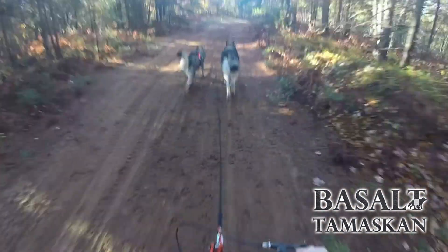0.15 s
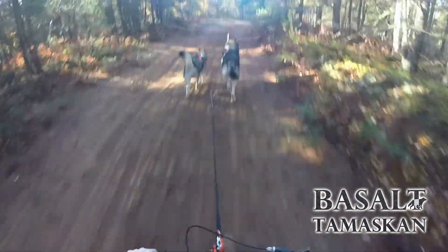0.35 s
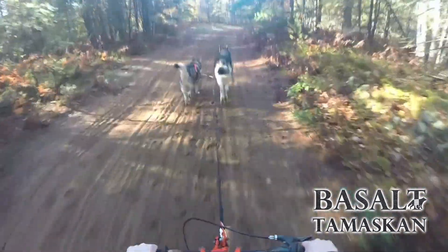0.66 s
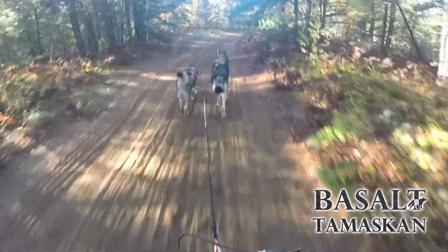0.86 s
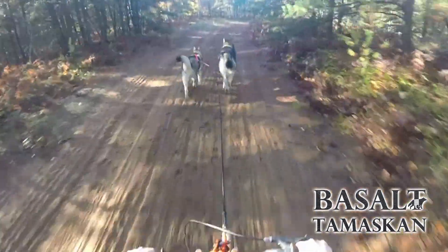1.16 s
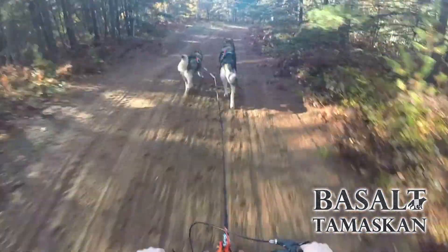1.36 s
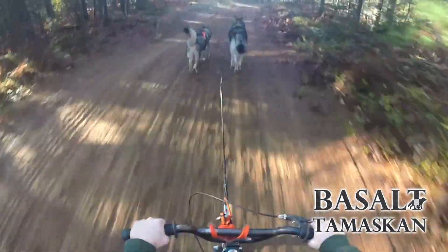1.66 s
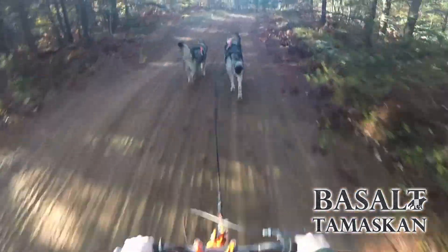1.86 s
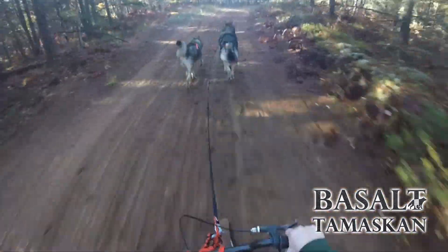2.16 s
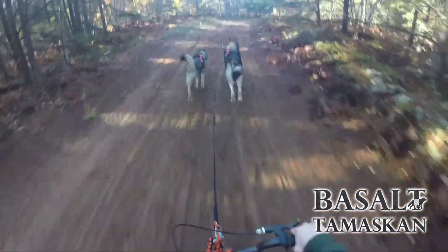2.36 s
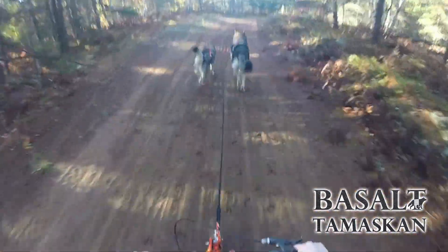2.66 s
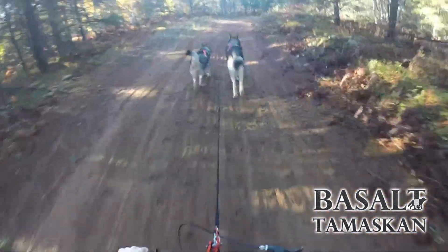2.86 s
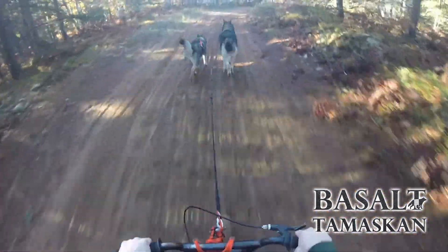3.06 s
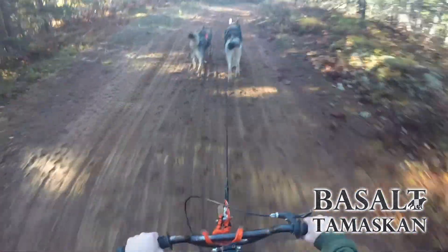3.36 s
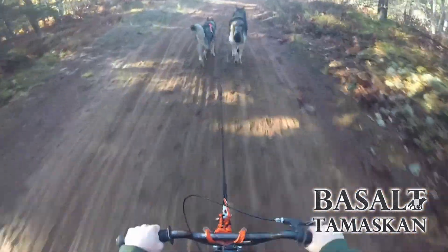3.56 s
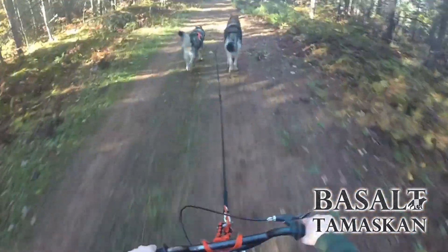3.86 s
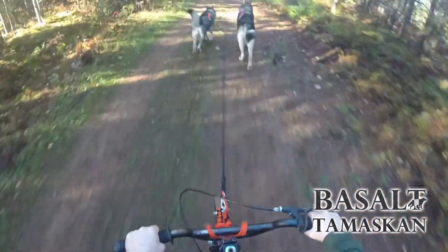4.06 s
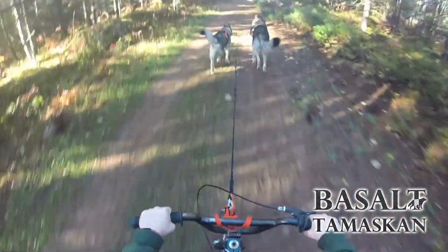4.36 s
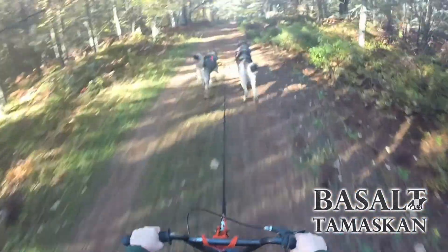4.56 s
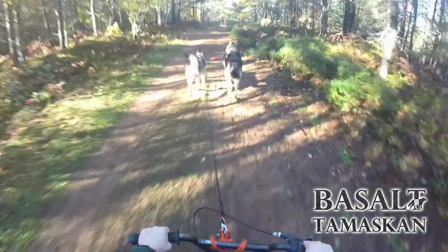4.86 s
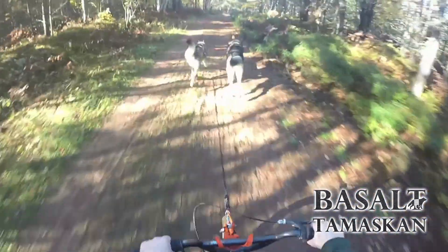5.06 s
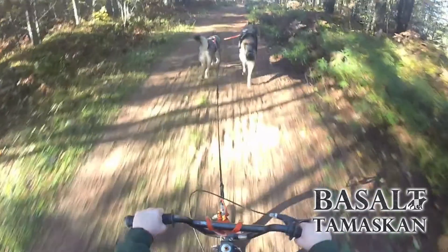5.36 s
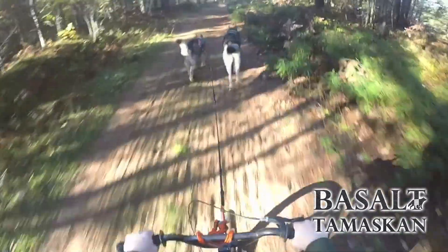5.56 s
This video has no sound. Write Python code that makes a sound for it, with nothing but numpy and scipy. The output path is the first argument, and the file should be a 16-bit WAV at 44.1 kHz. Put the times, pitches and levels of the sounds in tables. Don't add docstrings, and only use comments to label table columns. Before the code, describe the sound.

Close, rough handling rumble dominates: the padded microphone thumps over ruts and humps as headwind flutters against it. Beneath lies a continuous gritty tyre roll and faint airy hiss. Bright metal clips knock, rebound and chatter, with occasional thin steel rings and dull stone pings. The jingling thickens before two seconds, thins out, and after an abrupt change near 3.7 seconds the biggest low thuds arrive.

```python
import sys
import numpy as np
from scipy import signal
from scipy.io import wavfile
from scipy.ndimage import uniform_filter1d

SR = 44100
rng = np.random.default_rng(int(sys.argv[2]) if len(sys.argv) > 2 else 0)


def to_wav(s):
    ch = np.atleast_2d(s).T
    pcm = np.round(np.clip(ch, -1, 1) * 32767)
    wavfile.write(sys.argv[1], SR, pcm.astype(np.int16))


def invert_db(level):
    return 10 ** (np.asarray(level, dtype=float) / 20)


N = 251811

# peak in seconds, jolt
# in dB, build-up in ms.
RUTS_AND_HUMPS = [(0.133, -27, 0.64), (0.2416, -26, 3.3), (0.4507, -31.5, 7.2), (0.5834, -22.5, 9.7),
                  (0.6432, -29, 8.1), (1.207, -33, 4.1), (1.3344, -26.5, 1.2), (1.42, -24.5, 7.3),
                  (1.5265, -25, 3.5), (1.631, -32.5, 0.84), (1.6878, -25, 3.1), (1.7575, -24.5, 11),
                  (1.874, -27, 5), (1.9914, -19.5, 12), (2.0489, -33, 0.79), (2.1096, -16.5, 16),
                  (2.2146, -38.5, 1.1), (2.3943, -23, 6.2), (2.4532, -22, 10), (2.8628, -24.5, 7.9),
                  (2.9267, -35.5, 6.8), (3.055, -40, 0.72), (3.311, -23.5, 7), (3.376, -30.5, 8.7),
                  (3.566, -29, 3.4), (4.3282, -37, 6.9), (4.5065, -33, 4.4), (4.56, -32, 5.1),
                  (4.7475, -17.5, 20.6), (5.432, -27, 8.4),
                  (0.0405, -10.5, 31), (0.2127, -18, 19), (0.311, -15.5, 25), (0.696, -8.5, 40),
               (0.7744, -11.5, 34), (1.017, -19.5, 23), (1.153, -18.5, 22), (1.5947, -25.5, 14),
               (1.939, -33, 8.3), (2.1832, -14, 26), (2.277, -25.5, 12), (2.61, -11, 35.4),
               (4.404, -35.5, 6), (3.1656, -17, 23.6), (3.237, -12, 32.6), (3.428, -15.5, 26),
               (4.231, -20, 18.6), (3.6537, -13, 29), (3.7376, -26, 10.3), (3.7947, -22.5, 21),
               (3.922, -2.5, 71), (3.991, -13, 33.5), (4.125, -17, 18.8), (4.1994, -13, 34),
               (4.297, -7, 43.4), (4.83, -7.5, 44), (5.0726, -30, 8.6), (5.1495, -14.5, 33),
               (5.5088, -15.5, 19.8), (5.659, -24, 11.9)]
# frequency in Hz, level in dB per Hz.
WIND_SPECTRUM = [(45, -20), (70, 2), (105, -1.5), (135, -4.5), (190, -4), (255, -11.5), (360, -14),
                 (680, -18), (1000, -22), (1500, -26)]
# frequency in Hz, level in dB per Hz.
HISS_SPECTRUM = [(1760, -44), (3000, 4), (3710, 3), (4470, 7.5), (5200, -0.5), (6610, 3), (7180, -15),
                 (8010, -8), (9710, -3.5), (10700, -15), (12200, -32), (15500, -34)]
# frequency in Hz, level in dB per Hz.
GRIT_SPECTRUM = [(470, -16.5), (800, -25), (1030, -8), (1190, -3), (1760, -4.5), (2000, -0.5), (2510, -6.5),
                 (2680, -13), (2870, -6), (3400, -11), (4420, -46), (7480, -120)]
# time in seconds, level in dB.
LOOSE_GRIT = [
    (0.0, -65.5),
    (0.33, -68.5),
    (1.02, -69.5),
    (1.59, -68),
    (1.96, -67.5),
    (2.19, -69.5),
    (2.93, -69),
    (3.23, -70),
    (3.61, -70.5),
    (5.71, -69),
]
# start in seconds, level in dB, rebound delay in ms, rebound level in dB.
CLIP_BOUNCES = [(0.0098, -45, 24.3, -46.5), (0.4047, -48, 22.4, -51.5), (0.54, -45.5, 25, -53),
                (0.597, -55.5, 10.6, -43.5), (0.668, -48.5, 18, -51.5), (0.803, -61.5, 15, -54),
                (1.1058, -50.5, 17, -45.5), (1.207, -58, 19, -58.5), (1.3793, -45.5, 23, -52),
                (1.4183, -42.5, 24, -48), (1.5955, -41, 23.6, -45), (1.654, -49, 14.6, -53),
                (1.7033, -54, 21.6, -41), (1.7695, -40.5, 18.8, -41), (1.8983, -48, 29, -55),
                (1.9502, -56, 20, -53), (2.037, -58, 20.4, -48.5), (2.0785, -48.5, 14, -47.5),
                (2.139, -61, 26, -56), (2.436, -56.5, 15.5, -46), (2.8296, -45.5, 29.9, -50),
                (3.0875, -60, 23, -54), (3.3265, -47.5, 28, -53), (3.6983, -48, 28, -60.5),
                (4.3092, -49.5, 30.7, -46), (4.702, -47.5, 26, -60), (4.8834, -48, 28, -52.5),
                (5.1207, -46, 29.4, -74), (5.2609, -49.5, 19, -54), (5.4789, -49, 24, -60)]
# start in seconds, level in dB, chatter in ms, extra brightness in dB.
CLIP_CHATTERS = [(0.0929, -46.5, 8.5, 5), (0.116, -56, 8, 3.5), (0.1876, -53.5, 7.6, 1.5),
                 (0.275, -60.5, 5, 0), (0.648, -52, 5.3, -4), (0.7528, -55.5, 5.2, 4),
                 (1.032, -54.5, 5.4, 0.5), (1.1736, -54.5, 12, -1), (1.2423, -58.5, 6, -1),
                 (1.2902, -52.5, 8, 2.5), (1.4753, -45.5, 9.1, -1), (1.5654, -43, 13, 0),
                 (1.7614, -45, 4.1, -10), (1.8234, -49, 9.3, -1), (1.8764, -44.5, 12, 7.5),
                 (1.9889, -44, 11.8, 2), (2.4021, -59, 3.6, -20), (3.0703, -52, 7.7, 3),
                 (3.3957, -44.5, 7.5, 1.5), (3.6152, -49, 15.4, 1.8), (3.9203, -48.5, 8.1, 4),
                 (4.0006, -48.5, 20, -8), (4.032, -56, 3.6, 5), (4.0784, -53, 9.4, -4),
                 (4.1465, -53.5, 10.2, -1), (4.9512, -53.5, 13.4, -1.5), (5.1867, -54.5, 8.2, 1),
                 (5.527, -58.5, 6.9, 0), (5.5535, -49.5, 18, -3), (5.7031, -46, 5.3, 1)]
LIGHT_TOUCHES = [0.0714, 0.1456, 0.3345, 0.5243, 0.716, 0.7347, 0.86, 1.095, 1.277, 1.3316, 1.362, 1.523,
                 1.545, 2.823, 2.91, 3.0439, 3.244, 3.6053, 3.8335, 3.9845, 4.19, 4.359, 4.463, 4.6443,
                 4.77, 4.879, 4.9293, 5.0137, 5.2538, 5.433]
CLIP_PITCHES = [2060, 2495, 3114, 3580, 3930, 4250, 4520, 5380, 5790, 6000, 6250, 6590, 7030, 7530, 8510,
                9150, 9510, 9700, 10100, 10600, 11800, 12400, 13290, 13900, 15080]
# width in Hz, level in dB.
CLIP_RINGING = [(132, -4.5), (131, -6), (39.4, -8), (88.6, -16.5), (54.3, -7), (137, -5), (101, 0.5),
                (46.3, -17.5), (159, -13), (95, -13), (102, -18), (71.5, 1.5), (54, -7.5), (77.5, -9.5),
                (54.5, -9), (90, -4.5), (136, 2), (111, -11), (64.5, -5), (82, -20), (121, -19),
                (90, -12.5), (70, -15), (104, -15.5), (125, -12)]
# frequency in Hz, width in Hz, level in dB.
HOUSING_MODES = [(2210, 870, -12.5), (4530, 530, -5.5), (6140, 1930, 2), (9760, 770, -6),
                 (13300, 2500, -25)]
# middle of the scuff in seconds, level in dB, pitch in Hz.
STONE_PINGS = [(0.1211, -48, 1150), (0.4085, -47.5, 1530), (1.3269, -46.5, 1180), (1.5194, -45.5, 1230),
               (1.6227, -48, 1170), (1.7913, -42, 2050), (2.0408, -47.5, 1170), (2.2004, -48, 1160),
               (2.392, -45, 1150), (2.6045, -44, 1240), (2.8305, -60, 2210), (3.0245, -44.5, 2140),
               (3.1288, -45, 2080), (3.2605, -50, 1120), (3.3009, -45.5, 1220), (4.1165, -50, 1190),
               (4.7494, -53, 1210), (5.4301, -46, 2120)]
# start in seconds, peak in dB.
TAG_RINGS = [(0.539, -72), (1.109, -54.5), (1.4188, -57), (1.4742, -56), (1.5913, -79), (1.725, -63),
             (1.7704, -56), (1.826, -59), (1.8826, -56), (1.954, -59), (2.0784, -61), (2.453, -64),
             (2.833, -60), (3.3315, -66), (3.3922, -69), (3.616, -56), (4.3094, -72), (5.2619, -73),
             (5.4814, -60)]

MOUNT_HZ, MOUNT_WIDTH_HZ = 53, 14
SAG_HZ, PADDING_HZ, FOAM_HZ = 8, 60, 95
WIND_DB, START_DB, START_SETTLE_S = -63, 7.5, 0.056
HISS_DB, AFTERGLOW_DB, AFTERGLOW_S = -76, -22, 0.098
GRIT_DB, CRUNCH_PER_JOLT = -1.5, 18.7
FRAME_HZ, FRAME_WIDTH_HZ, FRAME_DB = 2123, 62, -20
TOUCH_DB, TOUCH_MS, HIT_MS, REBOUND_MS = -62, 4.5, 6, 3.6
TOUCH_BRIGHT_DB, HIT_BRIGHT_DB, REBOUND_BRIGHT_DB = -5, 2, -1.5
DEBRIS_AFTER_MS, DEBRIS_DB, DEBRIS_MS = 36, -17, 9.8
UPPER_HZ, TOP_HZ = 7800, 11500
UPPER_DB, UPPER_PER_DB, TOP_DB, TOP_PER_DB = -2, 0.01, -15.5, 0.2
COLOUR_SPREAD_DB = 3.5
TAG_HZ, TAG_WIDTH_HZ, TAG_DB = 3118, 8.2, -2.5
CHANGE_S, CHANGE_DB, CHANGE_SETTLE_S = 3.7074, -31, 0.0067
SELF_NOISE_DB, SELF_NOISE_TOP_HZ, CUTOFF_HZ = -87.5, 12700, 16250


def rms_one(x):
    return x / np.sqrt(np.mean(x ** 2) + 1e-20)


def butter(x, hz, kind, order=2):
    return signal.sosfilt(signal.butter(order, hz, kind, fs=SR, output="sos"), x)


def envelope(x, follow_s):
    return np.sqrt(np.abs(uniform_filter1d(x ** 2, round(follow_s * SR))) + 1e-14)


def in_time(rows):
    s, *columns = np.transpose(rows)
    return [np.interp(np.arange(N) / SR, s, c) for c in columns]


def drift(rate):
    r = np.exp(-80 * np.pi * rate / SR)
    noise = rng.standard_normal(N // 40 + 2002)
    slow = signal.lfilter([1], [1, -2 * r, r * r], noise)[2000:]
    return np.interp(np.arange(N) / 40, np.arange(len(slow)), rms_one(slow - slow.mean()))


def ring(clicks, hz, width_hz):
    r, w = np.exp(-np.pi * width_hz / SR), 2 * np.pi * hz / SR
    poles = [1, -2 * r * np.cos(w), r * r]
    stretches = np.split(clicks + 1e-18, [round(CHANGE_S * SR)])
    return np.concatenate([signal.lfilter([0, np.sin(w)], poles, part) for part in stretches])


def banded(source, spectrum, patchy_db, rate):
    hz, level_db = np.transpose(spectrum)
    edges = hz[0] * 2 ** np.arange(0, np.log2(min(hz[-1], 19000) / hz[0]), .25)
    out, together = 0, drift(rate / 3)
    for k, (low, high) in enumerate(zip(edges, edges[1:])):
        band_db = np.interp(np.log(low * high) / 2, np.log(hz), level_db)
        flicker_db = patchy_db * (0.66 * together + drift(rate))
        out = out + invert_db(band_db + flicker_db) * butter(source[k % 2], [low, high], "band")
    return rms_one(out)


def bumps():
    load, t = np.zeros(N + SR), np.arange(-SR // 8, SR // 8) / SR
    for s, jolt_db, build_ms in RUTS_AND_HUMPS:
        start = round(s * SR) + SR // 8
        push = np.exp(-np.abs(t) * np.where(t < 0, 1000, 2000) / build_ms) * 10 / build_ms
        load[start:start + len(t)] += invert_db(jolt_db) * push
    r = np.exp(-np.pi * MOUNT_WIDTH_HZ / SR)
    poles = [1, -2 * r * np.cos(2 * np.pi * MOUNT_HZ / SR), r * r]
    rung = butter(signal.lfilter([sum(poles)], poles, load), SAG_HZ, "high")
    padded = butter(rung, PADDING_HZ, "low")
    return butter(padded, FOAM_HZ, "low")[SR // 4:SR // 4 + N]


def sway(jolts, follow_s, calm_db):
    busy = np.sqrt(uniform_filter1d(jolts ** 2, round(follow_s * SR)) + invert_db(calm_db) ** 2)
    rocking = butter(rng.standard_normal(N + SR), [12, 30], "band")
    rocking = butter(rocking, 56.3, "low", order=4)[SR:]
    return busy * rms_one(rocking)


def headwind(shaking):
    level_db = WIND_DB + START_DB * np.exp(-np.arange(N) / SR / START_SETTLE_S)
    air = banded(rng.standard_normal((2, N)), WIND_SPECTRUM, patchy_db=1.64, rate=4.6)
    return invert_db(level_db) * (1 + 12 * shaking) * air


def far_hiss(metal):
    level = np.hypot(invert_db(HISS_DB), invert_db(AFTERGLOW_DB) * envelope(metal, AFTERGLOW_S))
    return level * banded(rng.standard_normal((2, N)), HISS_SPECTRUM, patchy_db=.8, rate=6.7)


def grit(per_s, size_db):
    sizes = invert_db(size_db * np.minimum(rng.exponential(1, (2, N)), 5)) * rng.choice([-1, 1], (2, N))
    pops = rms_one(sizes * (rng.random((2, N)) < per_s / SR))
    roll = rng.standard_normal((2, N))
    return banded(.7 * pops + .7 * roll, GRIT_SPECTRUM, patchy_db=1.6, rate=30)


def tyre_crunch(shaking):
    loose_db, = in_time(LOOSE_GRIT)
    crunch = invert_db(loose_db + GRIT_DB) * (1 + CRUNCH_PER_JOLT * shaking) * grit(per_s=1500, size_db=3.0)
    hum = rms_one(ring(crunch, FRAME_HZ, FRAME_WIDTH_HZ))
    return crunch + invert_db(loose_db + FRAME_DB) * hum


def contacts():
    rows = CLIP_CHATTERS + [(s, db, HIT_MS, HIT_BRIGHT_DB) for s, db, _, _ in CLIP_BOUNCES]
    rows += [(s + after_ms / 1000, db, REBOUND_MS, REBOUND_BRIGHT_DB) for s, _, after_ms, db in CLIP_BOUNCES]
    late = rng.uniform(.5, 1.6, len(rows)) * DEBRIS_AFTER_MS / 1000
    rows += [(row[0] + wait, row[1] + DEBRIS_DB, DEBRIS_MS, 0) for row, wait in zip(rows, late)]
    rows += [(s, TOUCH_DB, TOUCH_MS, TOUCH_BRIGHT_DB) for s in LIGHT_TOUCHES]
    s, level_db, chatter_ms, bright_db = np.transpose(rows)
    upper, top = (bright_db[:, None] + COLOUR_SPREAD_DB * rng.standard_normal((len(rows), 2))).T
    hard_db = level_db + 48
    upper_db = UPPER_DB + UPPER_PER_DB * hard_db + upper
    top_db = TOP_DB + TOP_PER_DB * hard_db + top
    return np.array([s, level_db, chatter_ms, upper_db, top_db])


def clips(ring_db, crack_db, spread_db, detune, count=60):
    s, level_db, chatter_ms, upper_db, top_db = contacts()[:, :, None]
    place = rng.random((len(s), count)) ** 1.3
    at = np.minimum(((s - .0008 + 3.0 * place * chatter_ms / 1000) * SR).astype(int), N - 1)
    at = np.where((s < CHANGE_S) & (at >= CHANGE_S * SR), N - 1, at)
    swell = np.minimum(place * chatter_ms / .9, 1)
    force = swell * invert_db(level_db - 19.8 * place + 3.18 * rng.standard_normal(at.shape))
    modes = [(hz, *ringing) for hz, ringing in zip(CLIP_PITCHES, CLIP_RINGING)]
    twins = [(hz + detune * width_hz * rng.standard_normal(), width_hz, db + 1.5)
             for hz, width_hz, db in modes * 2]
    out = np.zeros(N)
    for body, gain_db, vary_db in ((modes + twins, ring_db, spread_db), (HOUSING_MODES, crack_db, 3.2)):
        strengths = invert_db(vary_db * rng.standard_normal((len(s), len(body))))
        for (hz, width_hz, db), strength in zip(body, strengths.T):
            colour_db = (upper_db + 1.5) * (UPPER_HZ < hz < TOP_HZ) + (top_db + 15.5) * (hz >= TOP_HZ)
            height = invert_db(gain_db + db + colour_db) * np.sqrt(width_hz / 100) * strength[:, None]
            hits = force * height * rng.standard_normal(at.shape)
            clicks = np.bincount(at.ravel(), hits.ravel(), N)
            out += ring(clicks, hz, max(width_hz * 0.53, 8))
    return butter(out, 1270, "high")


def pings(width_hz, scuff_ms):
    out, scuff = np.zeros(N), np.hanning(round(scuff_ms * SR / 1000))
    for middle_s, level_db, hz in STONE_PINGS:
        start = round((middle_s - scuff_ms / 2000) * SR)
        push = np.zeros(SR // 8)
        push[:len(scuff)] = scuff * rng.standard_normal(len(scuff))
        note = ring(push, hz, width_hz)[:N - start]
        out[start:start + len(note)] += invert_db(level_db - 8.0) * note / np.abs(note).max()
    return out


def tag():
    s, level_db = np.transpose(TAG_RINGS)
    clicks = np.bincount((s * SR).astype(int), invert_db(level_db + TAG_DB), N)
    return butter(ring(clicks, TAG_HZ, TAG_WIDTH_HZ), [2900, 3300], "band")


def scene_change():
    t = np.arange(N) / SR - CHANGE_S
    return -invert_db(CHANGE_DB - 6.0) * np.sign(t) * np.exp(-np.abs(t) / CHANGE_SETTLE_S)


def scene():
    jolts = bumps()
    low = jolts + invert_db(-7.5) * sway(jolts, follow_s=.15, calm_db=-43)
    shaking = envelope(jolts, .04)
    metal = clips(ring_db=-22.5, crack_db=-14.0, spread_db=3, detune=0.66)
    air = headwind(shaking) + far_hiss(metal)
    stones = pings(width_hz=110, scuff_ms=14)
    mix = low + air + tyre_crunch(shaking) + metal + stones + tag() + scene_change()
    return mix[None]


def roll_off(x):
    return signal.sosfilt(signal.butter(12, 15870, fs=SR, output="sos"), x)


def record(dry):
    hiss = butter(rng.standard_normal(N), 7000, "high")
    hiss = butter(hiss, SELF_NOISE_TOP_HZ, "low", order=24)
    heard = dry + invert_db(SELF_NOISE_DB) * rms_one(hiss)
    mix = signal.sosfilt(signal.cheby2(10, 60, CUTOFF_HZ, fs=SR, output="sos"), heard)
    return roll_off(mix)


dry = scene()
out = record(dry)
to_wav(out)
```